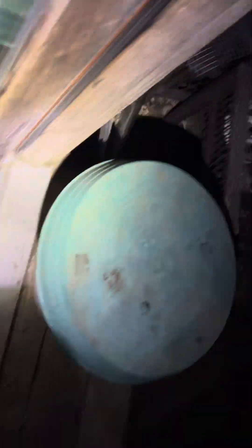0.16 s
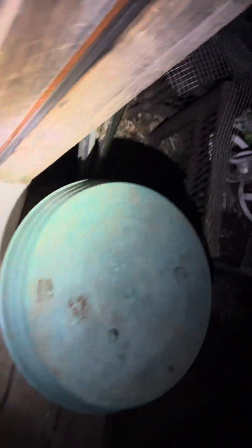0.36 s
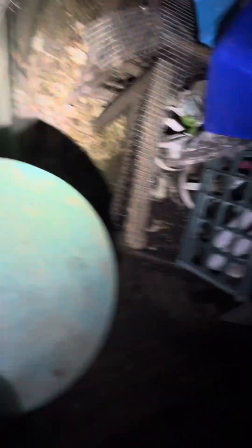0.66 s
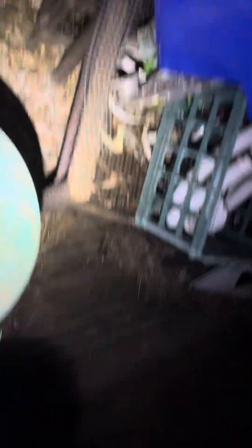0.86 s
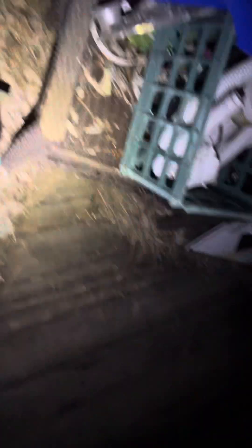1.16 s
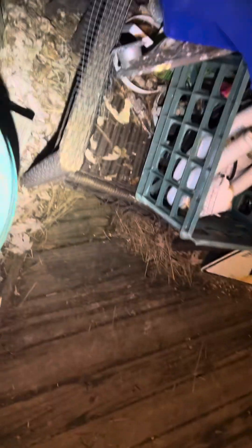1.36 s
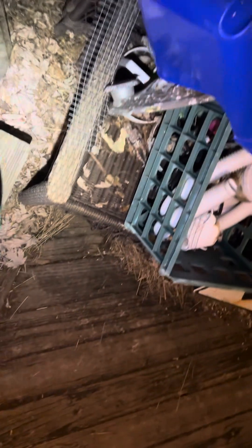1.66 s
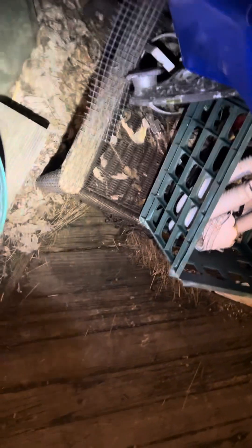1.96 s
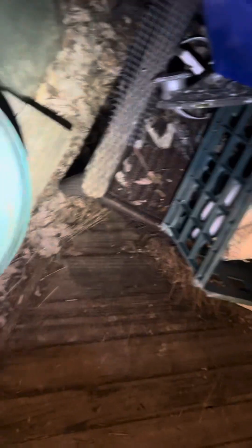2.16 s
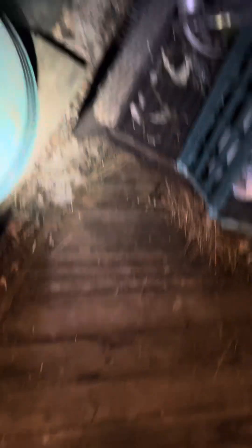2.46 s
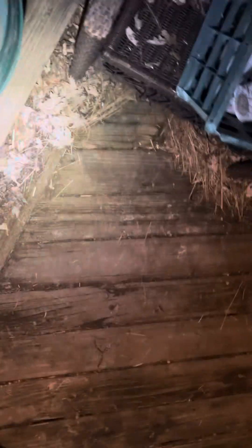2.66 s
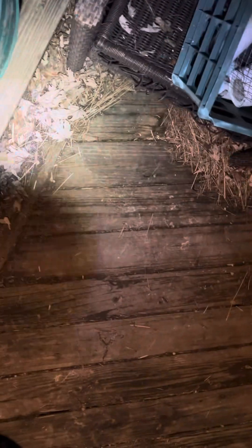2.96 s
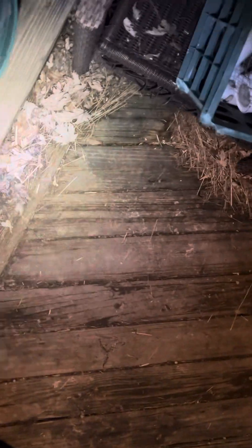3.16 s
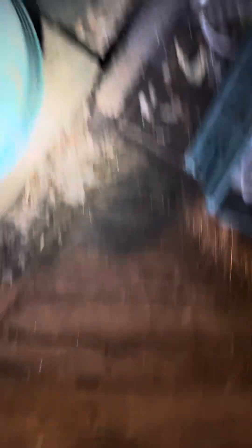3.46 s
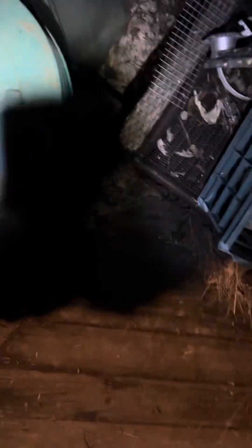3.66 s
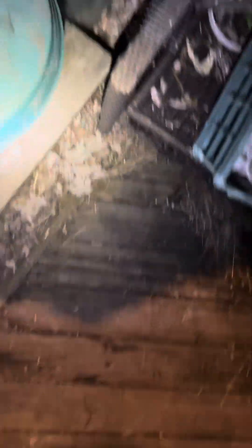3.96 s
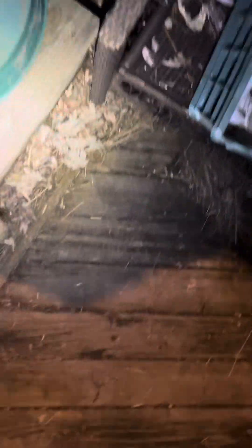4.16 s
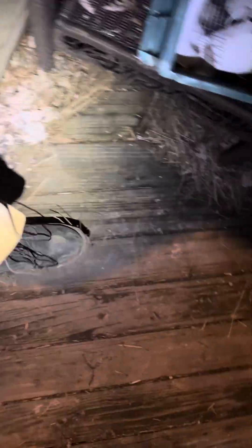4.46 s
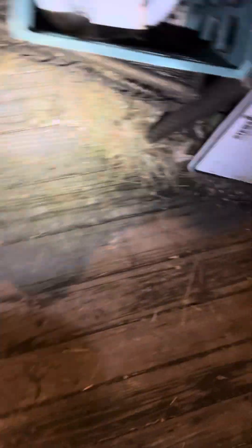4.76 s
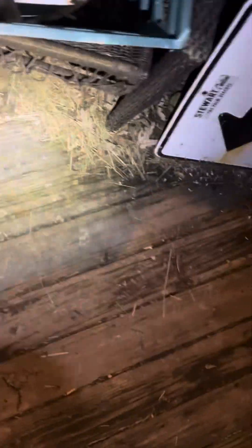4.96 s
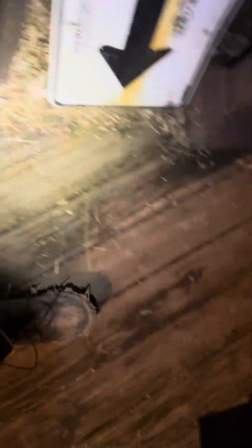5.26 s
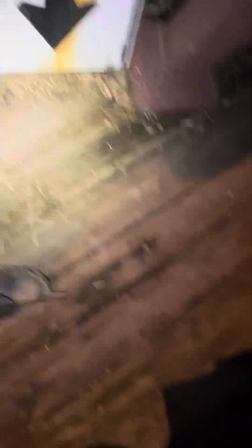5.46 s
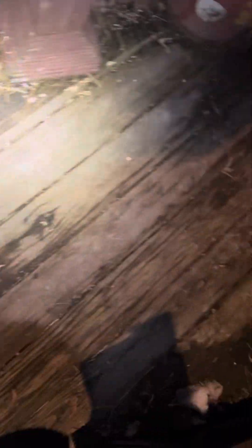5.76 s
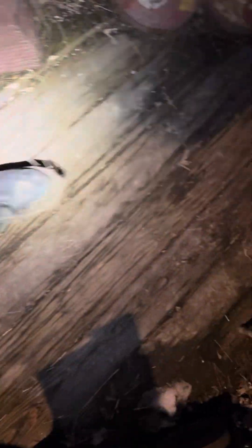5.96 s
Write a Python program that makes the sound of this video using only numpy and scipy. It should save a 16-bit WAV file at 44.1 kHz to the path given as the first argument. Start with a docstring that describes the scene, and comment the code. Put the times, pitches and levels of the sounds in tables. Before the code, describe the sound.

Boots shuffle and thud irregularly on a wooden plank floor, with rustling clothes, snapping straw and low handling rumble in a small shed.

```python
"""A boot scuffs through grit amid swishing clothes, then boots thud on the plank floor of a shed.
Someone shuffles and steps about, holding a camera whose two microphone ports hear it all.
Knocks ring the modes of planks and joists; scuffs, snapping straw and fabric are shaped grainy noise.
The hand rumbles on the camera body over a low, wavering sine drone, among short wall reflections."""
import sys
import numpy as np
from scipy import signal
from scipy.fft import rfft, irfft
from scipy.io import wavfile

SR = 44100
rng = np.random.default_rng(int(sys.argv[2]) if len(sys.argv) > 2 else 0)


def wrap_up_sound(samples):
    """Save the sound to the file named by the first command line argument, as 16-bit audio."""
    columns = np.atleast_2d(samples).T
    # keep every value between -1 and 1, then stretch to whole-number steps
    tamed = np.clip(columns, -1, 1)
    steps = np.round(tamed * 32767).astype(np.int16)
    wavfile.write(sys.argv[1], SR, steps)


N = 269451
T, HZ = np.arange(N) / SR, np.fft.rfftfreq(N, 1 / SR)

# modes of the floor planks: mode_hz [Hz], level_db [dB, relative], t60_s [s]
PLANKS = [(130, 7.5, 0.19), (170.6, 3.5, 0.23), (248.2, -4, 0.2), (275.2, -4, 0.3), (377, 0, 0.12),
          (412, -6.5, 0.24), (490, -8.5, 0.13), (549.4, -6, 0.22), (618, -1, 0.12), (758, 8, 0.029),
          (1142, 5, 0.038), (1320, 9, 0.019), (1570, 6, 0.064)]
# likeness of close sound at the two ports: freq_hz [Hz], likeness [0 to 1]
NEAR = [(100, 1), (300, 1), (700, 0.87), (2000, 0.55), (4000, 0.26), (5800, 1), (8000, 1)]
# how much hand and body move: time_s [s], level_db [dB, relative]
MOVEMENT = [(0, 6.5), (.52, 1.5), (.8, 8), (1.15, 3), (1.45, 3.5), (1.8, 2), (2.65, 1), (3.15, 3), (3.9, 2),
            (5.1, 1), (6.11, 2)]


def amp(db):
    """Decibels to gain."""
    return 10 ** (np.asarray(db) / 20)


def unit(x):
    """Scales to rms 1."""
    return x / np.sqrt(np.mean(x ** 2) + 1e-20)


def read(points, hz):
    """Reads a table of (Hz, value), joined on a log-frequency axis."""
    f, value = np.transpose(points)
    return np.interp(np.log(hz + 1), np.log(f + 1), value)


def over_time(points):
    """Reads a table of (s, value) at every sample, joined by straight lines."""
    return np.interp(T, *np.transpose(points))


def add(mix, s, sound):
    """Mixes a sound in at time s."""
    part = mix[..., max(round(s * SR), 0):][..., :sound.shape[-1]]
    part += sound[..., :part.shape[-1]]


def drift(per_s):
    """Smooth chance of rms 1, with little movement faster than per_s [Hz]."""
    return unit(irfft(rfft(rng.standard_normal(N)) * np.exp(-(HZ / per_s) ** 2), N))


def noise(gain, likeness, grain_db=0., ring_db=0., size=N):
    """Grainy noise at both ports, partly alike, coloured by gain(Hz) and by chance resonances ring_db deep."""
    hz = np.fft.rfftfreq(size, 1 / SR)
    grains = amp(grain_db * np.minimum(rng.exponential(1, size), 6))
    a, b = rfft(rng.standard_normal((2, size)) * grains)
    knots = np.arange(0, SR / 2, 90)  # Hz
    resonances = amp(ring_db * np.interp(hz, knots, rng.standard_normal(len(knots))))
    same = np.clip(read(likeness, hz), -1, 1)
    ports = np.array([a, same * a + np.sqrt(1 - same ** 2) * b])
    return unit(irfft(ports * gain(hz) * resonances, size))


def hump(hz, centre_hz, octaves):
    """A broad resonance on a log-frequency axis, leaning towards the bass."""
    resonance = 1 / (1 + (np.log2((hz + 1) / centre_hz) / octaves) ** 2)
    return resonance / np.sqrt(1 + hz / centre_hz)


def ring(t, hz, t60, swell_cycles=0.26):
    """One decaying mode; bending waves are slow in the bass, so low modes build up late."""
    swell = 1 - np.exp(-(t * hz / swell_cycles) ** 2)
    return np.sin(2 * np.pi * hz * t) * swell * np.exp(-np.log(1000) * t / t60)


def steps():
    """Each contact of a boot knocks on the planks, and body weight bounces the joists."""
    # heel, sole or toe meeting the boards, often several to a footfall: start_s [s], level_db [dB],
    # top_hz [Hz, hardness], bottom_hz [Hz, lightness], ring_db [dB, planks against knock],
    # spot_hz [Hz, what rings best here]
    contacts = [(0.273, -36.5, 90, 150, 2, 150), (0.639, -38.5, 254, 90, -10, 177),
                (0.813, -40.5, 150, 70, -9, 130), (0.856, -39.5, 264, 90, -5, 270),
                (0.881, -40.5, 245, 91, -2, 193), (1.4362, -29, 215, 410, -5, 283),
                (1.626, -40.5, 400, 153, -8, 250), (1.945, -44.5, 604, 200, 2.5, 380),
                (1.966, -32.5, 274, 313, 0, 260), (2.854, -37, 240, 150, 6.5, 224),
                (2.866, -42.5, 610, 200, 3, 550), (2.885, -35, 278, 139, 1.5, 282),
                (2.939, -44, 150, 110, 2, 134), (3.582, -36, 343, 80, -7.5, 240),
                (4.655, -22.5, 520, 121, -6, 245), (4.661, -33, 130, 60, -10, 143),
                (4.669, -31.5, 400, 400, -2.5, 490), (4.683, -33, 190, 260, 1, 252),
                (4.737, -41, 350, 200, -3, 300), (5.421, -45, 800, 445, 4, 477),
                (5.433, -37, 477, 610, -2.5, 520), (5.4427, -37.5, 240, 70, -1.5, 180),
                (6.006, -37.5, 910, 230, 2, 250), (6.021, -26.5, 347, 402, 1, 374),
                (6.037, -27, 342, 382, -0.5, 400), (6.045, -24.5, 298, 267, -10, 250)]
    # full body weight coming down: start_s [s], level_db [dB]
    bounces = [(3.59, -31), (4.6648, -24), (5.447, -25)]
    # modes of the joists under the planks: mode_hz [Hz], level_db [dB, relative], t60_s [s]
    joist_modes = [(45.2, 4.5, 0.24), (79.6, 1.5, 0.095)]
    out, t = np.zeros((2, N)), np.arange(16384) / SR
    joists = sum(amp(mode_db) * ring(t, hz, t60, swell_cycles=1.0) for hz, mode_db, t60 in joist_modes)
    for s, db, top_hz, bottom_hz, ring_db, spot_hz in contacts:
        add(out, s, blow(db, top_hz, bottom_hz, ring_db, spot_hz))
    for s, db in bounces:
        add(out, s, amp(db) * joists)
    return out


def blow(db, top_hz, bottom_hz, ring_db, spot_hz):
    """A knock runs along the boards as a quickly falling chirp and leaves them ringing, differently at every spot."""
    # spectrum of a knock on the boards: freq_hz [Hz], level_db [dB per Hz, relative]
    knock_spectrum = [(130, 0.5), (240, 2), (375, -5), (620, -9.5), (900, -16.5), (1450, -8), (1700, -20),
                      (2100, -14), (5000, -5.5)]
    lag_cycles = 1.3  # bending waves are slow in the bass: lower tones arrive later
    knock_s = .01  # the length over which the knock's level counts
    spot_db, spot_octaves = 5.5, 0.35  # modes that swing most at the struck spot stand out
    t, hz = np.arange(16384) / SR, np.fft.rfftfreq(16384, 1 / SR) + 1

    band = 1 / np.hypot(1, (hz / top_hz) ** 2) / np.hypot(1, (bottom_hz / hz) ** 2)
    chirp = np.exp(-2j * np.pi * lag_cycles * np.log(hz))
    knock = irfft(amp(read(knock_spectrum, hz)) * band * chirp) * (t < t[-1] / 2)

    spot = spot_db * np.exp(-(np.log2(np.array(PLANKS)[:, 0] / spot_hz) / spot_octaves) ** 2)
    detune = 1 + .012 * rng.standard_normal(len(PLANKS))
    modes = sum(amp(mode_db + lift_db) * ring(t, f * shift, t60)
                for (f, mode_db, t60), lift_db, shift in zip(PLANKS, spot, detune))
    boards = signal.fftconvolve(knock, modes)[:len(t)]
    return amp(db) * np.sqrt(knock_s / t[-1]) * (unit(knock) + amp(ring_db) * unit(boards))


def scuffs(slips_per_s=170, slip_db=1.5):
    """Short slides, with the footfalls and between them: a swell of friction grains that catches, slips and dies away."""
    # a boot dragging over the boards or sliding as it lands: peak_s [s], length_s [s], level_db [dB],
    # centre_hz [Hz], width [octaves]
    drags = [(0.112, 0.02, -37, 1010, 3.6), (0.163, 0.019, -51.5, 2010, 0.22),
             (0.179, 0.013, -41, 1050, 0.42), (0.238, .01, -44, 660, 0.2), (0.444, 0.018, -42, 1240, 3.5),
             (0.612, 0.0059, -36.5, 2110, 0.23), (0.258, 0.021, -51, 1200, 1.3),
             (1.44, 0.025, -43.5, 920, 1.1), (1.595, 0.015, -38.5, 905, 2.8), (3.593, 0.084, -44, 810, 4.8),
             (6.035, 0.037, -40.5, 1240, 0.67), (2.83, 0.046, -42.5, 880, 1.1),
             (2.88, 0.026, -41.5, 1340, 0.2), (2.872, 0.04, -38.5, 900, 1.5),
             (2.868, 0.047, -40, 572, 0.16), (1.46, 0.02, -48, 3360, 0.55), (1.548, 0.026, -39, 1550, 0.57),
             (1.625, 0.0143, -43, 970, 0.34), (2.034, 0.03, -45.5, 980, 1.5), (2.582, 0.03, -47, 1690, 5),
             (2.865, 0.023, -48, 3460, 0.93), (3.719, 0.015, -40.5, 2570, 1.16),
             (4.289, 0.027, -46.5, 2280, 3.6), (4.544, 0.013, -35.5, 920, 2.2),
             (4.796, 0.027, -40.5, 660, 1.9), (5.689, 0.066, -54.5, 3400, 3.1)]
    rise_share = .26  # of the length: a drag catches quickly
    out = np.zeros((2, N))
    for s, length, db, hz, octaves in drags:
        rise, fall = rise_share * length, (1 - rise_share) * length
        t = np.arange(16384) / SR - 2 * rise  # zero at the peak
        stroke = np.where(t < 0, np.exp(-(t / rise) ** 2), np.exp(-abs(t) / fall))

        def colour(f):
            return hump(f, hz, octaves) / (1 + (f / (hz * 3.4)) ** 2)

        grit = noise(colour, NEAR, grain_db=3.0, ring_db=3, size=len(t))
        add(out, s - 2 * rise, amp(db) * stroke * grit)
    return out * amp(slip_db * drift(slips_per_s))


def boards_under(x):
    """A sliding sole also drives the planks, which answer with their modes."""
    t = np.arange(SR // 4) / SR
    answer = sum(amp(mode_db) * ring(t, hz, t60) for hz, mode_db, t60 in PLANKS)
    return signal.fftconvolve(x, answer[None] / np.linalg.norm(answer), axes=1)[:, :N]


def scrape():
    """Gritty friction excites a few high resonances, each in fits and starts, until the foot has settled."""
    # thin ringing of something hard scraping along: centre_hz [Hz], width_hz [Hz], level_db [dB, relative]
    resonances = [(2970, 490, -1), (3830, 340, 1), (5240, 560, 1.5)]
    start_s, end_s, rise_s, fall_s = 5.932, 6.045, 0.024, 0.011
    level_db, fade_db_per_s = -50, -43
    grit = np.zeros((2, N))
    for hz, width, db in resonances:
        band = noise(lambda f: 1 / (1 + (2 * (f - hz) / width) ** 2), NEAR, grain_db=5)
        grit += band * amp(db + 2.5 * np.tanh(drift(45)))
    since, after = np.maximum(T - start_s, 0), np.maximum(T - end_s, 0)
    stroke = np.minimum(since / rise_s, 1) * np.exp(-after / fall_s)
    return unit(grit) * stroke * amp(level_db + fade_db_per_s * since)


def snaps(crack_s=0.00021, bend_s=0.0011, crumble_s=0.013):
    """A stalk bends, cracks, and its fibres crumble briefly; every stalk rings differently."""
    # snaps of straw and grit: crack_s [s], crack_db [dB], crumble_db [dB], centre_hz [Hz, brightness]
    stalks = [(0.4391, -29, -44, 10200), (0.6106, -49, -54, 2200), (0.629, -58, -47, 7000),
              (0.684, -36, -54, 12500), (0.8461, -26.5, -46.5, 6100), (0.862, -31, -41, 8140),
              (1.1308, -24, -33, 9000), (1.192, -41, -46.5, 8600), (1.438, -58, -42.5, 6860),
              (1.494, -36, -58, 6650), (1.546, -58, -45, 6830), (1.588, -20, -40, 6800),
              (1.595, -26, -52, 9000), (1.6256, -18.5, -37, 5130), (1.981, -57, -49, 11400),
              (2.352, -41, -48, 3400), (2.3745, -37, -45.5, 11000), (3.498, -38, -43, 6040),
              (3.562, -46, -43, 3710), (3.755, -50, -48.5, 4730), (3.815, -50, -63, 7950),
              (3.89, -54, -54, 5900), (4.543, -62, -39.5, 9700), (4.799, -33, -49, 5760),
              (5.461, -35.5, -47, 9700)]
    out, t = np.zeros((2, N)), np.arange(-512, 7680) / SR  # zero at the crack
    for s, crack_db, crumble_db, hz in stalks:
        crack = amp(crack_db) * np.exp(-abs(t) / crack_s)
        crumble = amp(crumble_db) * np.exp(-abs(t) / np.where(t < 0, bend_s, crumble_s))
        stalk = noise(lambda f: hump(f, hz, 1.35), NEAR, ring_db=5, size=len(t))
        add(out, s + t[0], (crack + crumble) * stalk)
    return out


def clinks():
    """A tiny piece of metal rattles and rings high in a close pair of modes."""
    # a small metal part clinking: start_s [s], level_db [dB]
    taps = [(2.3525, -53), (2.373, -42.5)]
    modes_hz, t60_s = (10781, 10851), .13
    out, t = np.zeros(N), np.arange(SR // 4) / SR
    for s, db in taps:
        add(out, s, amp(db) * sum(ring(t, hz, t60_s) for hz in modes_hz))
    return out * (1 + 1.0 * drift(150))


def straw(rel_db=-4.5, centre_hz=3800, octaves=2.0, clump_db=4, catches_per_s=120, catch_s=0.0019):
    """Loose stalks catch and let go one by one, in clumps, loudest when the limbs move."""
    catches = (rng.random(N) < catches_per_s / SR) * rng.random(N)
    bursts = unit(signal.lfilter([1], [1, -np.exp(-1 / (catch_s * SR))], catches))
    crackle = bursts * noise(lambda f: hump(f, centre_hz, octaves), NEAR)
    return crackle * swing(centre_hz) * amp(rel_db + clump_db * np.tanh(drift(7.2)))


def clothes():
    """Fabric slides over fabric in tiny catches; each register flutters on its own."""
    # spectrum of rubbing fabric: freq_hz [Hz], level_db [dB per Hz, relative]
    cloth = [(300, -1), (700, 9), (1300, 11.5), (1800, 8), (2300, 11), (3200, 4), (5200, 8.5), (7500, 1.5),
             (11000, -2.5), (14000, 3.5), (16200, -40)]
    threads = rfft(noise(lambda f: amp(read(cloth, f)), NEAR, grain_db=1.0, ring_db=2.5))
    centres = np.geomspace(1000, 12000, num=5)  # Hz
    register = np.interp(HZ, centres, np.arange(len(centres)))
    folds = np.zeros((2, N))
    for k, hz in enumerate(centres):
        band = irfft(threads * np.maximum(1 - abs(register - k), 0), N)  # crossfades into its neighbours
        folds += band * swing(hz) * amp(1.85 * drift(35))
    return folds * amp(0.13 * drift(90))


def swing(hz):
    """Loudness of the fabric around hz: every stroke swells and fades, over a faint rest level."""
    # strokes of clothing as the limbs swing: peak_s [s], rise_s [s], fall_s [s],
    # level_db [dB at 9 kHz], brightness [dB per octave]
    swishes = [(.23, .4, 0.23, -51, 4), (.66, 0.19, 0.33, -57.5, 2), (.875, 0.089, 0.077, -47.5, 8.5),
               (1.34, 0.11, 0.06, -54, 6), (1.5, 0.14, 0.092, -57.5, -0.5), (2.02, 0.37, 0.12, -61, 2),
               (2.455, 0.079, 0.94, -52, 2.5), (2.78, 0.039, 0.11, -45.5, 4), (3.208, 0.11, 0.27, -48.5, 1),
               (3.46, 0.024, 0.04, -45, 2), (3.55, 0.13, 0.051, -42.5, 1.8),
               (4.02, 0.12, 0.085, -54.5, 2.5), (4.3, 0.16, 0.16, -57.5, 2), (4.68, 0.96, 0.69, -67.5, 3),
               (5.29, 0.057, 0.038, -60.5, 3.5), (5.48, 0.16, 0.074, -62, 2.5),
               (5.98, 0.033, 0.089, -51.5, 2)]
    rest_db = -74  # fabric never lies quite still; this follows the movement
    power = amp(rest_db + over_time(MOVEMENT)) ** 2
    for s, rise, fall, db, bright_db in swishes:
        stroke = np.exp(-((T - s) / np.where(T < s, rise, fall)) ** 2)
        power = power + (amp(db + bright_db * np.log2(hz / 9000)) * stroke) ** 2
    return np.sqrt(power)


def tinted(x):
    """Lifts the narrow resonances of the camera body."""
    # resonances that tint every rustle: centre_hz [Hz], width_hz [Hz], lift_db [dB]
    body = [(2238, 90, 3), (3465, 60, 3), (8312, 250, 2)]
    lift = sum((amp(db) - 1) / (1 + 2j * (HZ - hz) / width) for hz, width, db in body)
    return irfft(rfft(x) * (1 + lift), N)


def handling():
    """The hand shakes the camera body and rubs on its case."""
    # spectrum of the shaking: freq_hz [Hz], level_db [dB per Hz, relative]
    rumble_spectrum = [(22, -60), (33, -18), (43, -6), (52, 2.5), (66, -7.5), (85, -3.5), (110, -14),
                       (150, -22.5), (300, -43), (900, -54.5)]
    # level of the shaking: time_s [s], level_db [dB]
    shake = [(0, -45.5), (.45, -50), (.75, -43), (1.15, -42), (2.3, -45), (2.7, -48), (3.45, -45),
             (3.82, -41.5), (4.15, -51.5), (4.7, -40), (4.95, -48), (5.2, -43.5), (5.35, -51),
             (5.55, -42.5), (5.76, -51), (6.0, -41.5)]
    # spectrum of the rubbing on the case: freq_hz [Hz], level_db [dB per Hz, relative]
    case = [(25, -22), (60, -0.5), (130, 4.5), (190, 1.5), (280, 0.5), (370, -3), (520, -6), (740, -4.5),
            (1000, -9.5), (1400, -14), (2100, -27), (3200, -24), (8000, -67)]
    # likeness of scattered sound at the two ports: freq_hz [Hz], likeness [0 to 1]
    far = [(130, 0.97), (290, 0.95), (640, 0.29), (1400, 0.35), (3000, 0.73)]
    rumble = noise(lambda f: amp(read(rumble_spectrum, f)), NEAR) * amp(over_time(shake))
    rub = noise(lambda f: amp(read(case, f)), far, grain_db=3)
    rub_db = -51 + over_time(MOVEMENT) + 1.31 * drift(32.0)
    return rumble + rub * amp(rub_db)


def drone():
    """A deep sine hum, wavering in pitch and level, that grows as the walker comes further in."""
    turns = np.cumsum(50.5 + 2.57 * drift(5.2)) / SR  # pitch in Hz, summed to cycles
    entering_db = np.interp(T, (.5, .8), (-6, 0))
    return amp(-57.5 + entering_db + 1.8 * drift(0.17)) * np.sin(2 * np.pi * turns)


def shed(x):
    """Dense, short reflections from close wooden walls, different at each port."""
    # decay of the shed: freq_hz [Hz], t60_s [s]
    decay = [(100, 0.037), (500, 0.23), (2000, 0.18), (12000, 0.0097)]
    taps = rng.standard_normal((2, SR // 3)) * (rng.random((2, SR // 3)) < .08)
    taps[:, :SR // 250] = 0  # 4 ms to the nearest wall and back
    hz, t, z = signal.stft(taps, SR, nperseg=256)
    fade = np.exp(-np.log(1000) * t / read(decay, hz)[:, None])
    tail = signal.istft(z * fade, SR, nperseg=256)[1]
    return signal.fftconvolve(x, tail / np.linalg.norm(tail[0]), axes=1)[:, :N]


def scene():
    """Feet, litter and clothes in the shed, over the rumble of the hand and the drone."""
    slides = scuffs()
    thuds = steps() + amp(-16.0) * boards_under(slides)
    litter = slides + scrape() + snaps() + clinks() + straw()
    reflections = shed(amp(-21.5) * thuds + amp(-18.0) * litter)
    return thuds + tinted(litter + clothes()) + reflections + handling() + drone()


def record(dry):
    """The spaced ports hear with a delay and a tilt between them; then the band limit."""
    # phase between the ports: freq_hz [Hz], left_lead [radians]
    port_phase = [(0, 0), (300, -.3), (800, -.9), (1300, -.8), (1800, .1), (2500, 2.3), (3100, 3.1),
                  (4000, 1.8), (5100, 1.8), (6000, 3.14), (8200, 6.28), (10350, 9.42), (12600, 12.57),
                  (16000, 17.1)]
    # balance of the ports: freq_hz [Hz], left_minus_right_db [dB]
    port_balance = [(60, 0.6), (120, 0.5), (250, 3.5), (500, 5), (1100, 3.5), (2200, 1.5), (4000, 0),
                    (8000, -0.6)]
    lead = np.interp(HZ, *np.transpose(port_phase))
    tilt = amp(read(port_balance, HZ) / 2)  # half to each port
    top = 1 / np.hypot(1, (HZ / 15800) ** 16)  # the microphone fades in the highest treble
    ports = irfft(rfft(dry) * top * np.array([tilt, np.exp(-1j * lead) / tilt]), N)
    band_limit = signal.firwin(511, 16100, window=("kaiser", 9), fs=SR)  # low-pass, Hz
    return signal.oaconvolve(ports, band_limit[None], "same")


dry = scene()
out = record(dry)
wrap_up_sound(out)
```